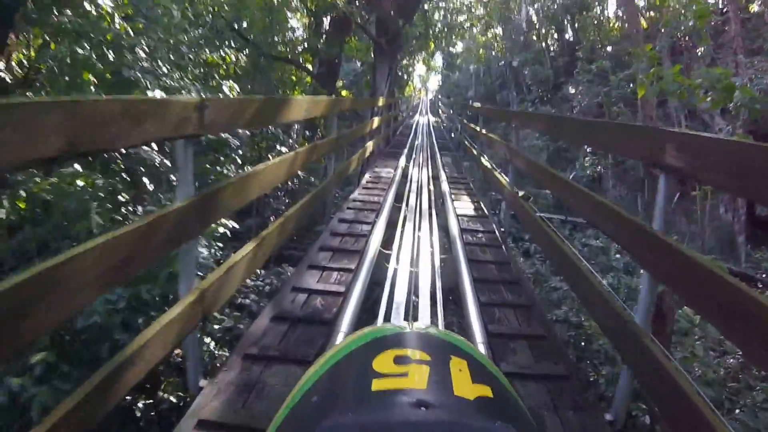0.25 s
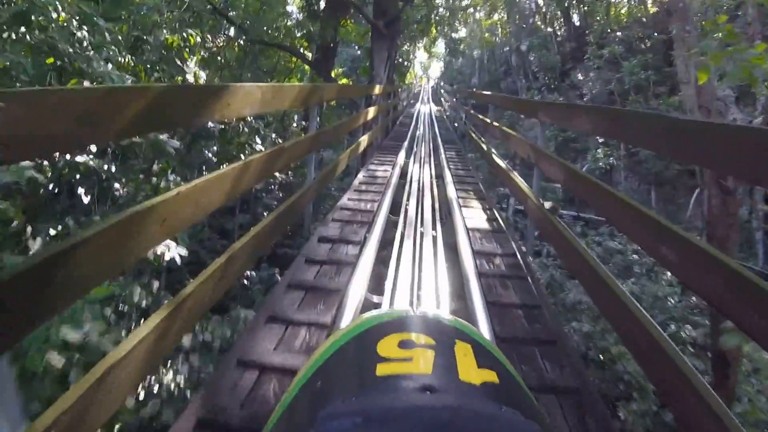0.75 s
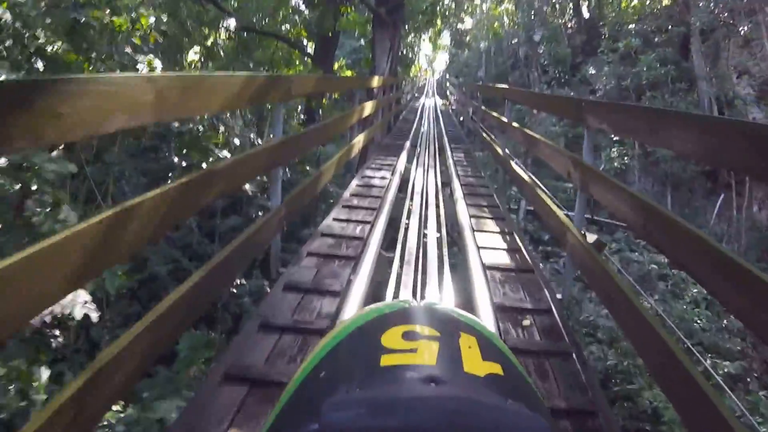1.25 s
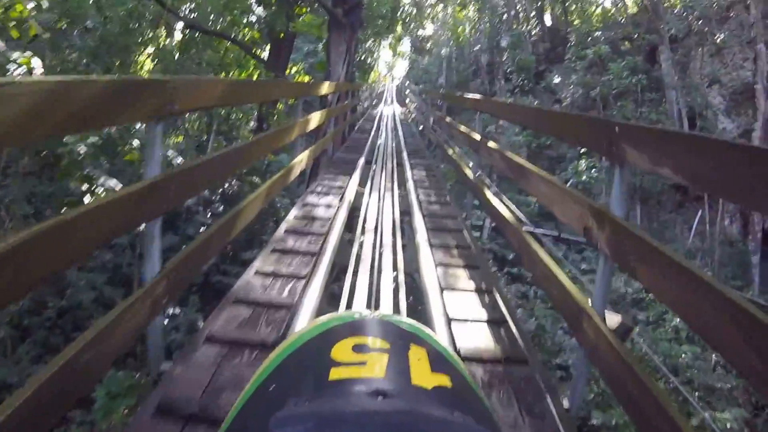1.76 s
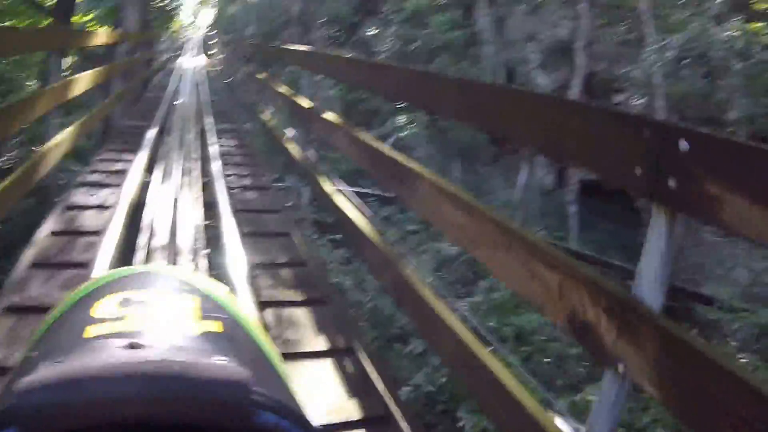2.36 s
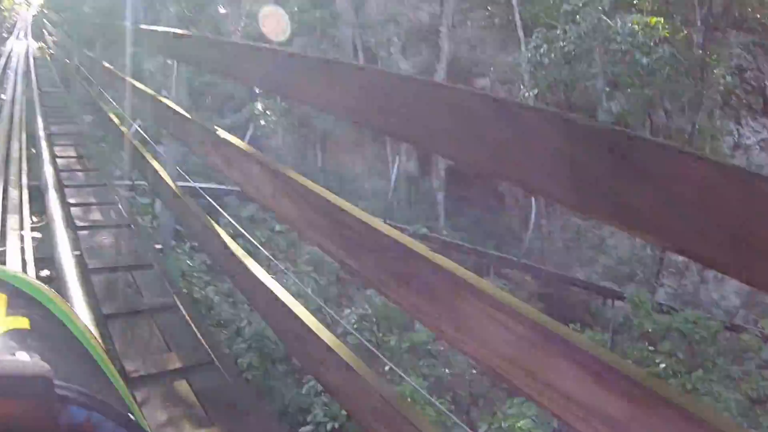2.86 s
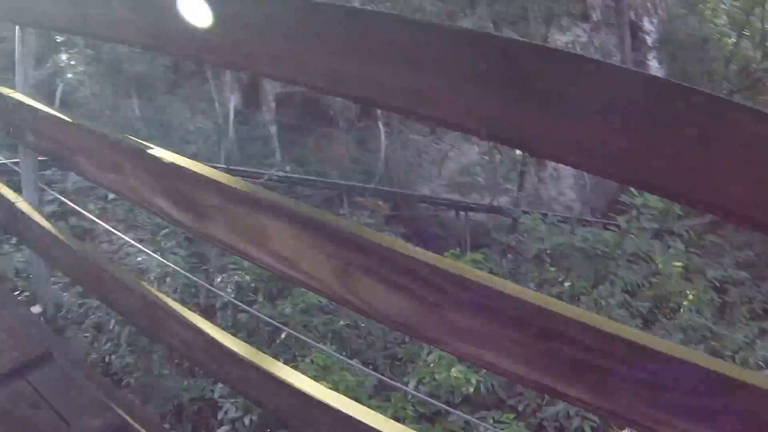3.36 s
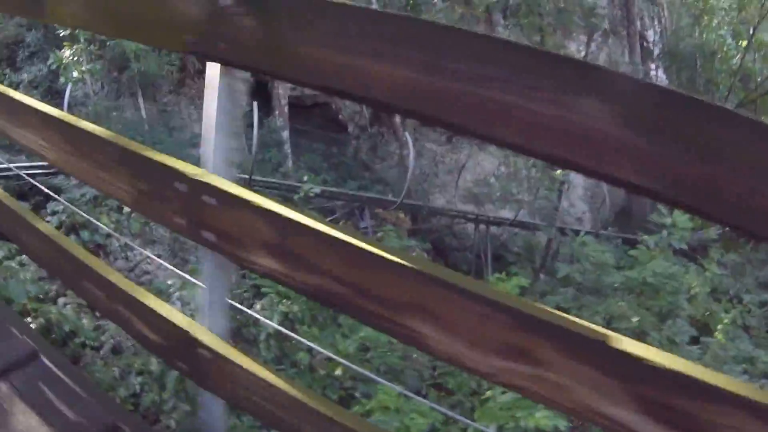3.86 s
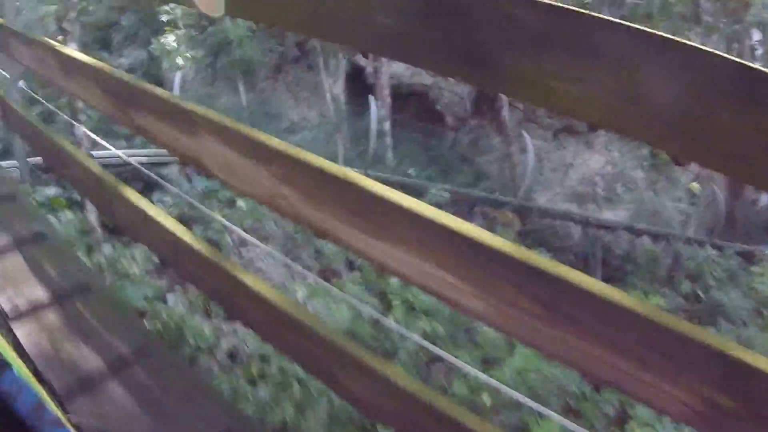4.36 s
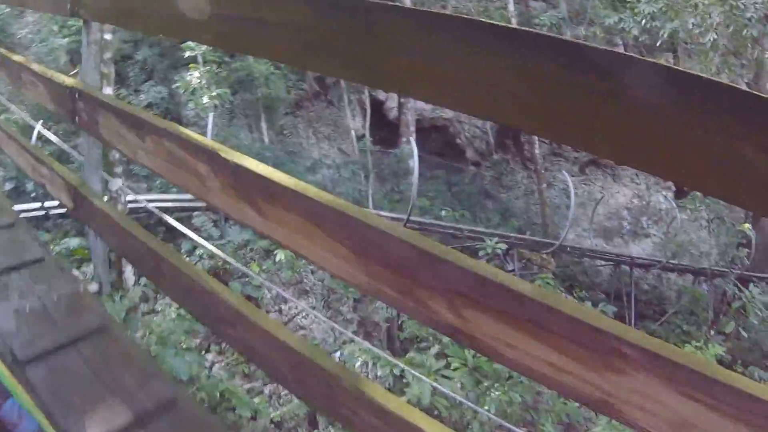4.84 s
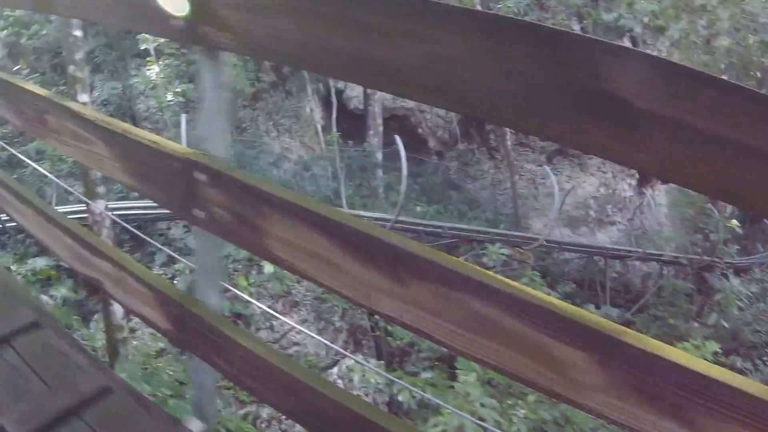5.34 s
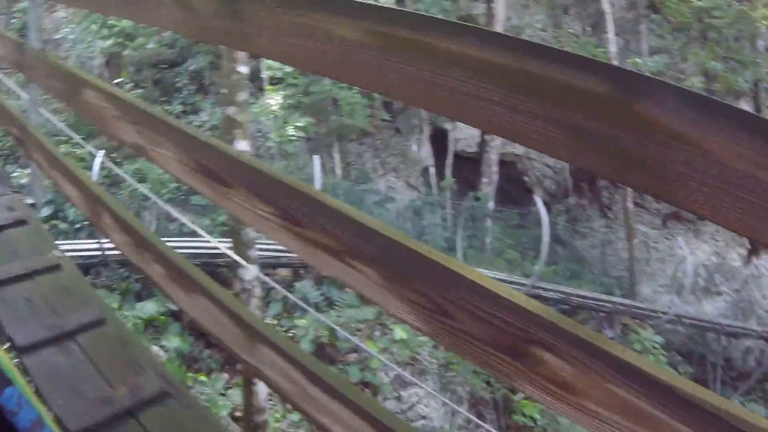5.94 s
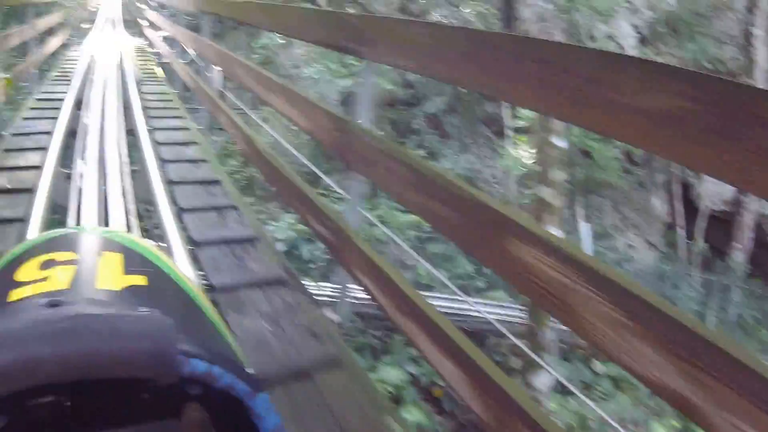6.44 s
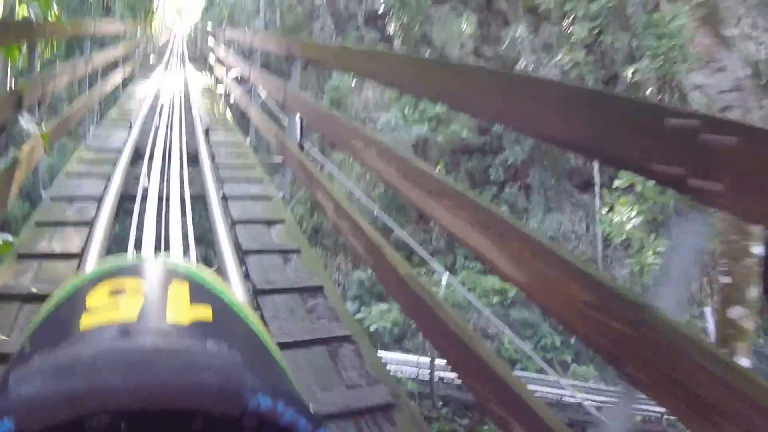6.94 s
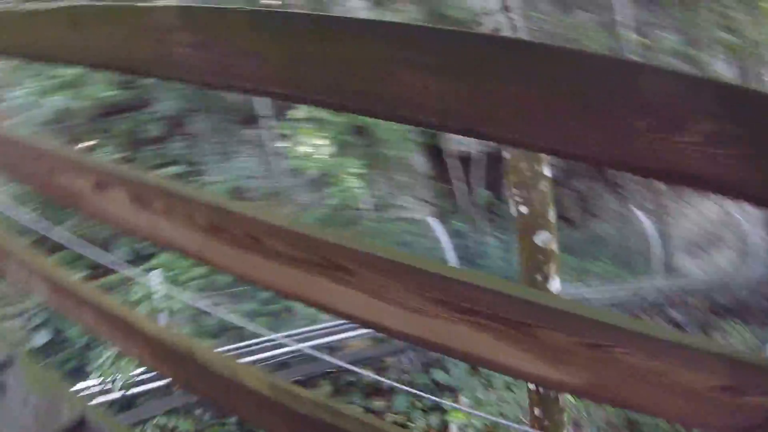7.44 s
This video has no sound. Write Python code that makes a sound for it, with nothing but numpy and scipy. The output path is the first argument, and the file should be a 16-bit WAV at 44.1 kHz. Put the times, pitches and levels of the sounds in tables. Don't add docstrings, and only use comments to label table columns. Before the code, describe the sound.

Cart wheels thud in pairs over steel rail joints, hollow shell booming, panels slapping and loose metal clacking, over low rumble and forest insects.

```python
import sys
import numpy as np
from scipy import signal
from scipy.fft import rfft, irfft
from scipy.io import wavfile
from scipy.ndimage import uniform_filter1d

SR = 44100
rng = np.random.default_rng(int(sys.argv[2]) if len(sys.argv) > 2 else 0)


def nominal_scale(level):
    x = np.asarray(level, float) / 20
    return 10 ** x


def waveform_to_disk(signal):
    frames = np.transpose(np.atleast_2d(signal))
    scaled = np.clip(frames, -1, 1) * 32767
    samples = np.round(scaled).astype(np.int16)
    wavfile.write(sys.argv[1], SR, samples)


N = 339570
T = np.arange(N) / SR

# pitch in Hz, level in dB, t60 in seconds.
SHELL_MODES = [(101, -13.5, 0.075), (150.5, 2, 0.24), (202.3, -13.5, 0.29), (233.4, -23, 0.53)]
# pitch in Hz, level in dB, t60 in seconds.
PANEL_MODES = [(318, 9.5, 0.054), (419, -7, 0.12), (498.6, -4, 0.074), (608, -6, 0.091), (712, -5.5, 0.048),
               (862, -11, 0.048)]
# frequency in Hz, level in dB.
RATTLE_COLOUR = [(410, 0.5), (700, 3), (965, -1.5), (1180, -0.5), (1530, -6.5), (1970, -5.5), (3440, -21.5),
                 (4740, -23), (5930, -25.5), (9000, -75.5), (11700, -78), (19800, -120)]
# start in seconds, first blow in dB, gap in seconds, second blow in dB, third blow in dB.
RAIL_JOINTS = [(.127, -25, .017, -10, -11.5), (.893, -12, .018, -4.5, -14.5), (1.641, -8.5, .03, -9.5, -18),
               (2.415, -10, .028, -7.5, -30), (3.173, -10.5, .028, -5.5, -27),
               (3.945, -8.5, .019, -6, -17.5), (4.688, -8.5, .022, -4.5, -18),
               (5.453, -9.5, .023, -5.5, -14), (6.233, -8.5, .019, -4.5, -33), (6.994, -8, .029, -8, -42)]
# start in seconds, shell in dB, panel in dB, panel pitch in Hz.
REAR_WHEELS = [(1.34, -27.5, -28, 485), (2.128, -24.5, -25, 384), (2.148, -26.5, -25, 642),
               (2.174, -22.5, -28, 346), (2.93, -29, -33.5, 380), (2.964, -20, -20.5, 497),
               (3.66, -25.5, -28.5, 470), (3.7, -29.5, -32, 384), (4.418, -21.5, -26.5, 445),
               (5.171, -26, -21, 419), (5.192, -21, -19, 458), (5.939, -33.5, -21, 669),
               (5.978, -19, -22.5, 602), (6.712, -19.5, -21, 347), (6.729, -22.5, -25, 413),
               (6.745, -25, -20.5, 390), (7.52, -20, -20, 384)]
# start in seconds, shell in dB, panel in dB, panel pitch in Hz.
RAIL_BUMPS = [(.784, -22, -29, 399), (0.83, -16.5, -22.5, 400), (1.108, -22.5, -25.5, 384),
              (1.783, -21.5, -22, 585), (2.367, -17, -22.5, 359), (2.769, -17, -23.5, 427),
              (3.513, -31, -34, 379), (3.542, -24, -26, 523), (3.822, -30, -26, 510),
              (4.895, -19.5, -23.5, 475), (5.255, -22.5, -30, 364), (5.298, -23, -25, 448),
              (5.76, -25, -27.5, 535), (6.349, -19, -29, 536), (6.914, -23.5, -30.5, 373),
              (7.104, -30, -32.5, 510), (7.217, -16, -19, 575), (7.626, -25, -35.5, 381)]


def curve(table):
    s, *columns = np.transpose(table)
    return [np.interp(T, s, c) for c in columns]


def unit(x):
    return x / np.sqrt(np.mean(x ** 2))


def ring(x, modes):
    out = 0
    for hz, db, t60 in modes:
        r = np.exp(-np.log(1000) / (t60 * SR))
        w = 2 * np.pi * hz / SR
        out = out + nominal_scale(db) * signal.lfilter([0, r * np.sin(w)], [1, -2 * r * np.cos(w), r * r], x)
    return out


def colour(x, table):
    hz, db = np.transpose(table)
    f = np.fft.rfftfreq(len(x), 1 / SR) + 1
    return irfft(rfft(x) * nominal_scale(np.interp(np.log(f), np.log(hz), db)), len(x))


def low_pass(x, order, hz):
    return signal.sosfilt(signal.butter(order, hz, fs=SR, output="sos"), x)


def band(lo_hz, hi_hz):
    sos = signal.butter(2, [lo_hz, hi_hz], "band", fs=SR, output="sos")
    return unit(signal.sosfilt(sos, rng.standard_normal(N)))


def walk(rate):
    k = int(SR / rate)
    steps = np.repeat(rng.standard_normal(N // k + 1), k)
    return uniform_filter1d(uniform_filter1d(steps, k), k)[:N]


def add(out, s, piece):
    i = max(int(s * SR), 0)
    out[i:i + len(piece)] += piece[:N - i]


def whine(table):
    hz, db = curve(table)
    return nominal_scale(db + 3.7 * walk(9.6)) * band(7.3, 55) * np.sin(2 * np.pi * np.cumsum(hz) / SR)


def pings(table, rise_s):
    out, t = np.zeros(N), T[:SR // 4]
    for (s, db, hz, t60), noise in zip(table, rng.standard_normal((len(table), len(t)))):
        wobble = 2.1 * np.sqrt(hz / SR) * uniform_filter1d(np.cumsum(noise), size=40) / 10
        swell = nominal_scale(db - 60 * t / np.clip(t60, .02, .2)) * (1 - np.exp(-t / rise_s))
        add(out, s, swell * np.sin(2 * np.pi * hz * t + wobble))
    return out


def blows(table, rise_s, soft, rough, modes, ring_db, crunch=0):
    out, swells, t = np.zeros(N), np.zeros(N), T[:SR // 8]
    chance = rng.standard_normal((len(table), len(t)))
    for (s, db, hz), noise in zip(table, chance):
        swell = nominal_scale(db) * (t / rise_s * np.exp(1 - t / rise_s)) ** soft * (1 - (t / t[-1]) ** 4)
        drift = uniform_filter1d(uniform_filter1d(np.cumsum(noise), size=70), size=70)
        turn = 2 * np.pi * hz * t + rough * np.sqrt(hz / SR) * drift
        add(out, s - rise_s, swell * (np.sin(turn) + 0.076 * np.sin(2 * turn + 1)))
        add(swells, s - rise_s, swell)
    out = out + swells * crunch
    return out + nominal_scale(ring_db) * ring(out, modes), swells


def air(roll_db):
    # frequency in Hz, level in dB per Hz.
    air_colour = [(35, 1), (60, -17), (97, -25.5), (147, -11.5), (255, -11.5), (313, -21.5), (403, -21),
                  (495, -19), (1160, -32), (2100, -33), (3050, -39.5), (3650, -43), (4000, -42.5),
                  (5260, -45.5), (8320, -45.5), (12900, -57), (14400, -58)]
    roll_drift, shake_drift = [db - db.mean() for db in roll_db]
    out = 0
    for hz in 70 * 2 ** np.arange(0, 7.6, .5):
        share = np.clip(np.log2(hz / 600), 0, 1)
        drift_db = (1 - share) * 0.87 * roll_drift + share * (hz < 3800) * 0.42 * shake_drift
        flicker_db = (3.5 - 2.5 * share) * walk(10)
        out = out + band(hz / 1.165, hz * 1.207) * np.sqrt(hz) * nominal_scale(drift_db + flicker_db)
    return nominal_scale(-64.0) * colour(out, air_colour)


def wind():
    # start in seconds, level in dB.
    gusts = [(0, -49), (.2, -36.5), (.9, -40), (1.7, -43), (2.25, -39), (2.95, -39), (4.4, -43), (5.2, -38),
             (5.6, -45.5), (6.0, -40.5), (6.9, -43.5), (7.7, -44)]
    return nominal_scale(curve(gusts)[0] + 0.27 * walk(1.9) + 4.2 * walk(12)) * band(5.0, 75)


def cicadas():
    # start in seconds, level in dB.
    chorus = [
        (0, -71),
        (1.2, -68),
        (2.2, -72),
        (2.55, -58),
        (3.2, -55),
        (4.7, -50),
        (5.4, -55.5),
        (5.85, -54),
        (6.7, -68),
    ]
    db, = curve(chorus)
    hz = 5895 * (1 + 0.003 * walk(1.4))
    far_db = -61.5 + 0.24 * (db + 61.0)
    buzz = band(9, 95) + 0.56 * band(140, 340)
    core = nominal_scale(1.0 * walk(9.4) - 3.0) * buzz * np.sin(2 * np.pi * np.cumsum(hz) / SR)
    near = nominal_scale(db) * (core + nominal_scale(-16.5) * band(6630, 7870))
    return near + nominal_scale(far_db - 1.0) * band(4290, 5800)


def bird():
    # start in seconds, pitch in Hz, level in dB.
    whistle = [
        (2.785, 8350, -80),
        (2.8, 8600, -60),
        (2.825, 9650, -64),
        (2.836, 9360, -58),
        (2.845, 7960, -53),
        (2.865, 6980, -52),
        (2.9, 6840, -70),
        (2.945, 7300, -63),
        (2.96, 7200, -82),
    ]
    hz, db = curve(whistle)
    during = (T > whistle[0][0]) * (T < whistle[-1][0])
    call = nominal_scale(db + 3.0 * walk(120)) * np.sin(2 * np.pi * np.cumsum(hz) / SR) * during
    t = T[:SR // 4]
    trunks = rng.standard_normal(len(t)) * nominal_scale(-38 - 60 * t / 0.4)
    return nominal_scale(-3) * call + signal.fftconvolve(call, trunks)[:N]


def cricket():
    # start in seconds, pitch in Hz, level in dB.
    trill = [(0, 6450, -72), (1.27, 6480, -72), (1.33, 6150, -95), (1.4, 6140, -63), (2.1, 6210, -68),
             (2.5, 6130, -71), (5.8, 6080, -63.5), (7.3, 6130, -73.5), (7.7, 6150, -87)]
    return whine(trill)


def bearing():
    # start in seconds, pitch in Hz, level in dB.
    squeal = [(0, 4000, -69), (1.2, 3940, -70), (2.4, 3900, -70), (2.8, 3850, -86.5), (5.3, 3850, -82),
              (5.8, 3790, -73), (7.7, 3870, -71)]
    return whine(squeal)


def jolts():
    # start in seconds, peak in dB, pitch in Hz.
    jerks = [
        (1.33, -26.5, 29.5),
        (2.42, -34, 46.6),
        (5.0, -33, 41),
    ]
    return blows(jerks, 0.0417, 0.83, 0.27, SHELL_MODES, -68)[0]


def rolling(db, swells):
    # pitch in Hz, level in dB, t60 in seconds.
    hum = [(319.5, -4.5, 0.17), (504, -8, 0.16), (733.4, -14, 0.22)]
    keep = np.exp(-1 / (0.0082 * SR))
    shake = signal.lfilter([1 - keep], [1, -keep], swells)
    rough = nominal_scale(db + 4 * walk(40) + 2 * walk(9))
    grains = rng.standard_normal(N)
    shell = nominal_scale(-34.5) * ring(grains * (rough + 0.34 * shake), SHELL_MODES)
    return shell + nominal_scale(-42.0) * ring(grains * (rough + 0.38 * shake), PANEL_MODES + hum)


def rail():
    # start in seconds, level in dB, pitch in Hz, t60 in seconds.
    strikes = [(0, -69, 2070, 5), (1.64, -45, 1990, .8), (.6, -65, 2075, 3), (1.958, -57, 2000, .3),
               (3.845, -56, 3880, .1), (3.168, -42, 2040, 1.05), (3.63, -58, 3140, .3),
               (4.686, -40, 2020, .8), (4.83, -55, 2020, .7), (6.226, -43, 2000, 1)]
    split_hz, rough = 57, .5
    low, high, t = np.zeros(N), np.zeros(N), T[:SR]
    for s, db, hz, t60 in strikes:
        fade = nominal_scale(db - 60 * t / t60) * (1 - np.exp(-t / 0.0044))
        early = np.exp(-t / 0.16)
        main = np.sin(2 * np.pi * hz * (t - .0015 * early))
        third = .7 * early * np.sin(2 * np.pi * (hz + 2 * split_hz) * t + 2)
        add(low, s, fade * (main + third))
        add(high, s, 1.1 * fade * np.exp(-t / 0.26) * np.sin(2 * np.pi * (hz + split_hz) * t))
    return low * (1 + rough * band(6.6, 45)) + high * (1 + rough * band(6.6, 45))


def panel_notes():
    # start in seconds, level in dB, pitch in Hz, t60 in seconds.
    sung = [(.815, -25.5, 720, 0.044), (.94, -26, 150, .2), (1.778, -30, 810, .05), (2.24, -39, 850, 0.12),
            (2.358, -30, 705, 0.051), (2.385, -23, 149, 0.18), (2.408, -25, 693, .06),
            (4.0, -19.5, 193, 0.22), (5.4475, -16, 1146, .03), (6.99, -46, 1130, .04),
            (1.335, -38, 630, 0.091), (1.635, -20, 677, 0.13), (1.66, -32, 660, 0.11),
            (1.786, -30.5, 580, 0.096), (2.12, -25, 675, 0.12), (2.755, -22, 540, 0.06),
            (3.167, -23, 1020, 0.046), (3.195, -28, 613, 0.074), (3.651, -26, 690, .06),
            (3.937, -30, 750, .05), (4.078, -32.5, 730, 0.052), (4.552, -30.5, 618, 0.044),
            (4.71, -22, 944, 0.15), (4.735, -31, 577, 0.074), (4.735, -32, 957, 0.098),
            (4.829, -31, 1153, .08), (4.856, -37, 1145, .15), (4.891, -25, 498, 0.087),
            (4.893, -39, 1150, 0.09), (5.032, -38.5, 830, 0.075), (5.29, -38, 500, 0.062),
            (5.598, -27, 1060, 0.12), (5.6, -35, 1155, 0.092), (5.616, -21, 780, 0.06),
            (5.667, -29, 903, 0.05), (5.688, -35, 865, 0.13), (5.927, -22, 910, 0.096),
            (5.93, -21.5, 677, 0.16), (5.96, -30, 1250, .08), (6.052, -31, 792, 0.16),
            (6.052, -33, 546, 0.077), (6.126, -44, 775, .08), (6.227, -29, 984, 0.088),
            (6.984, -23, 684, 0.058)]
    return pings(sung, 0.0024)


def metal_notes():
    # start in seconds, level in dB, pitch in Hz, t60 in seconds.
    parts = [(1.634, -31, 2710, 0.048), (1.636, -52, 4441, .1), (1.636, -40.5, 5370, 0.26),
             (1.66, -44, 1860, 0.087), (1.66, -46, 2220, 0.087), (1.784, -37, 2820, 0.054),
             (1.784, -38, 3190, 0.055), (1.81, -39, 2180, .08), (2.12, -35.5, 1324, 0.063),
             (2.12, -47, 2080, 0.2), (2.237, -32, 1850, 0.033), (2.24, -57, 2900, .05),
             (2.407, -30.5, 1880, 0.051), (3.167, -31, 3070, 0.066), (3.167, -39, 4070, .07),
             (3.167, -31.5, 4570, 0.058), (3.96, -44, 1870, 0.086), (3.962, -52, 2900, .08),
             (4.686, -26, 1970, 0.23), (4.686, -34, 3080, 0.099), (4.686, -39, 3630, 0.072),
             (4.71, -33, 1920, 0.045), (4.71, -40, 2320, 0.05), (4.735, -40, 2170, 0.06),
             (4.829, -35, 1453, .08), (4.829, -34, 2580, 0.06), (4.833, -38, 2980, .08),
             (4.957, -37, 1830, .05), (5.03, -40, 1650, 0.043), (5.447, -24, 1570, 0.055),
             (5.447, -43, 4000, 0.14), (5.449, -41, 5300, 0.066), (5.449, -46, 2940, .04),
             (5.472, -32, 1420, 0.088), (5.555, -44, 1780, 0.11), (5.597, -40, 2420, 0.086),
             (5.598, -43, 4270, 0.11), (5.62, -43, 2050, .08), (5.62, -44, 5150, .1),
             (5.638, -45, 3100, .06), (5.689, -47, 1820, 0.065), (5.742, -38, 1830, .08),
             (5.925, -31, 2290, .07), (5.925, -26, 3030, 0.052), (5.96, -42, 2330, 0.091),
             (6.05, -51, 2050, .06), (6.154, -39.5, 1740, .08), (6.229, -35, 3110, .07),
             (6.25, -39, 2050, .1), (6.252, -34, 2800, 0.072)]
    return pings(parts, 0.001)


def more_notes():
    # start in seconds, level in dB, pitch in Hz, t60 in seconds.
    swings = [(.773, -27, 332, 0.048), (.975, -26, 150, .15), (2.185, -26, 308, 0.095),
              (2.21, -29, 159, 0.14), (2.468, -20, 190, 0.094), (3.648, -26.5, 718, 0.042),
              (6.325, -27, 200, .15), (4.406, -24, 334, 0.056), (4.406, -37, 860, 0.086),
              (6.0, -27, 248, 0.086), (6.7, -30, 700, .05), (6.725, -24, 690, .05),
              (6.735, -28, 337, 0.093), (7.04, -24, 200, .06), (7.228, -28, 170, .08),
              (7.535, -30, 153.5, .2), (1.777, -22, 518, .04)]
    return pings(swings, .003)


def dry_ticks():
    # start in seconds, level in dB, t60 in seconds.
    bursts = [(.817, -47, 0.035), (1.81, -38, .08), (.1235, -34, .04), (4.407, -55, 0.036),
              (4.6905, -28.5, 0.048), (5.4483, -13.5, 0.039), (5.51, -32, .05), (5.62, -35, .06),
              (5.6674, -37, .05), (5.689, -42, .04), (5.7427, -43, 0.055), (5.946, -30, .04),
              (5.97, -30, .05), (2.4066, -28, .03), (6.058, -36, 0.052), (6.127, -42.5, .04),
              (6.2323, -30.5, .04)]
    out, t = np.zeros(N), T[:4096]
    for (s, db, t60), noise in zip(bursts, rng.standard_normal((len(bursts), len(t)))):
        fade = nominal_scale(db - 60 * t / max(t60, .015)) * (1 - np.exp(-t / .0004))
        add(out, s, fade * unit(colour(noise, RATTLE_COLOUR)))
    return out


def metal_rows():
    # start in seconds, peak in dB, top in dB, pitch of the loose part in Hz,
    # rattle t60 in seconds.
    at_joints = [(0.1233, -45, -26, 1390, 0.4), (0.8803, -36.5, -3, 1280, 0.55),
                 (1.634, -26.5, -6, 1874, 0.5), (2.4075, -26, -41, 1600, 0.29),
                 (3.167, -23.5, -8, 2070, 0.62), (3.938, -38, -9, 1280, 0.78),
                 (4.6854, -20, -16, 2210, 0.65), (5.447, -17, -14, 1620, 0.76),
                 (6.2262, -24, -10.5, 2040, 0.6), (6.987, -32, -15, 1810, 0.34)]
    falling = [(0.918, -35.5, -8, 1320, 0.1), (1.3119, -37.5, -11, 1250, 0.3),
               (1.333, -37.5, 1, 1400, 0.16), (3.962, -36, -4, 2660, 0.14), (1.785, -31, -18, 2240, 0.75),
               (2.1206, -37, -40, 1790, 0.43), (2.2376, -39, -32, 1940, .12), (2.569, -41, -37, 1780, 0.2),
               (3.8462, -48.5, -4, 1440, 0.62), (4.829, -29.5, -18, 2250, 0.38),
               (4.8926, -34, -29, 2030, 0.5), (4.961, -39.5, -30, 1730, 0.3), (5.028, -49, -22, 1670, 0.54),
               (5.16, -40.5, -14, 1280, 0.97), (5.289, -38.5, -27, 1750, 0.035),
               (5.355, -36.5, -15, 1930, 0.19), (5.5976, -29, -7.5, 2280, 0.32),
               (5.62, -35.5, -16, 1830, 0.55), (5.688, -37, -22, 1800, 1), (5.9247, -21.5, -14, 1736, 0.89),
               (6.1253, -45, -24, 1730, 0.23), (6.156, -57, -23, 1710, 0.12)]
    faint = [(s - 0.011, db - 25.5, -5.5, 1410, 0.17) for s, _, db, _ in REAR_WHEELS + RAIL_BUMPS]
    again = [(s + joint[2], db - 8.5, top_db, hz * 1.2, 0.066)
             for (s, db, top_db, hz, _), joint in zip(at_joints, RAIL_JOINTS)]
    return again + at_joints + falling + faint


def clacks(table):
    # pitch in Hz, level in dB, t60 in seconds.
    metal_modes = [(1146, 4, 0.2), (1358, -3, 0.12), (1703, -6.5, 0.47), (1970, -6, 0.084),
                   (2030, -22, 5.4), (2290, -7.5, 1.6), (2406, -4, 0.14), (2610, -10.5, 0.53),
                   (2967, -10, 0.17), (3820, -20.5, 0.22), (4000, -23.5, 0.53), (4630, -14.5, 0.52)]
    strike, notes, rattle, top = np.zeros((4, N))
    t = T[:SR // 2]
    ping = (1 - np.exp(-t / .0006)) * np.exp(-t / .008)
    crash = nominal_scale(-1.5) * np.tanh(t / .004) * np.exp(-(t / 0.027) ** 2)
    for (s, db, top_db, hz, t60), burst in zip(table, rng.standard_normal((len(table), 61))):
        add(strike, s, nominal_scale(db) * burst)
        add(notes, s, nominal_scale(db) * ping * np.sin(2 * np.pi * hz * t))
        fade = (1 - np.exp(-t / 0.00037)) * (np.exp(-t / 0.017) + 0.59 * nominal_scale(-60 * t / max(t60, .02)))
        add(rattle, s - .001, nominal_scale(db) * fade)
        add(top, s - .001, nominal_scale(db + top_db) * (fade + crash))
    grit = nominal_scale(2.0 * walk(150))
    noise = unit(colour(rng.standard_normal(N), RATTLE_COLOUR))
    out = nominal_scale(-7.0) * rattle * grit * noise + nominal_scale(-14.5) * top * grit * band(2800, 5300) + nominal_scale(-3.5) * notes
    damped = [(f, db, min(.35 * t60, .14)) for f, db, t60 in metal_modes]
    out = out + nominal_scale(-57) * ring(strike, damped)
    out = out + nominal_scale(-46.0) * ring(rattle * grit * rng.standard_normal(N), damped)
    out = colour(out, [(3310, 0), (3560, -6), (3810, 0)])
    spray = nominal_scale(-38) * top * grit * band(6000, 9700)
    return spray + low_pass(out, 6, 6300)


def panel_rows():
    # start in seconds, first in dB, first pitch in Hz, second in dB.
    slaps = [(.129, -23, 550, -24.5), (.905, -13.5, 384, -22.5), (1.643, -17, 546, -19),
             (2.431, -22.5, 470, -25), (3.177, -15.5, 534, -16), (3.949, -19.5, 450, -21.5),
             (4.693, -45, 410, -12), (5.46, -30, 713, -11.5), (6.228, -21.5, 620, -12.5),
             (6.995, -19.5, 473, -20.5)]
    # start in seconds, length in seconds, level in dB, pitch in Hz.
    chatter = [
        (4.917, .07, -44, 563),
        (5.508, 0.2, -32, 712),
        (6.018, .13, -29.5, 657),
        (6.272, .03, -41, 488),
    ]
    rows = [row for s, db1, hz, db2 in slaps for row in ((s, db1, hz), (s + .02, db2, 443))]
    rows += [(s - 0.005946, db, hz) for s, _, db, hz in REAR_WHEELS + RAIL_BUMPS]
    for (s, length, db, hz), c in zip(chatter, rng.standard_normal((len(chatter), 3, 12))):
        late = 0.041 * (np.arange(12) + .25 * c[0])
        levels = db - 30 * late + 8.5 * c[1]
        hits = zip(s + late, levels, hz * (1 + 0.074 * c[2]))
        rows += [hit for hit in hits if hit[0] < s + length]
    return rows


def panels():
    knocks, _ = blows(panel_rows(), 0.00508, 0.56, 1.845, PANEL_MODES, -43.0, crunch=0.35 * band(463, 853))
    return low_pass(knocks, 4, 1250)


def sags():
    rows = [(s + .07, max(db1, db2) - 19.5 - 5.5, 120.7) for s, db1, _, db2, _ in RAIL_JOINTS]
    return blows(rows, 0.04, 0.8, 0.1, SHELL_MODES[:1], -73.5)[0]


def shell_rows():
    joint_hz = [194.3, 197.1, 184.7]
    # start in seconds, level in dB.
    shudders = [(.355, -36), (0.428, -24), (0.879, -12.5), (1.013, -22.5), (1.413, -23), (1.808, -28),
                (2.728, -27), (3.25, -25), (3.345, -23), (4.048, -29), (4.401, -27.5), (4.441, -27),
                (4.458, -25), (4.486, -29.5), (4.754, -12.5), (4.815, -22.5), (5.598, -28), (6.016, -19.5),
                (6.071, -22), (6.292, -21), (6.331, -36), (6.762, -18)]
    rows = [row for s, db1, gap, db2, db3 in RAIL_JOINTS
            for row in zip((s, s + gap, s + gap + 0.02194), (db1, db2, db3), joint_hz)]
    small = [row[:2] for row in REAR_WHEELS + RAIL_BUMPS] + shudders
    rows += [(s, db, 175 * (1 + 0.1 * c) + 1.18 * (db + 14.5))
             for (s, db), c in zip(small, rng.standard_normal(len(small)))]
    return rows


def wheel_thuds():
    return blows(shell_rows(), 0.00743, 1.91, 0.077, SHELL_MODES, -58.0)


def scene():
    # start in seconds, rolling in dB, shaking of loose metal in dB.
    haul = [(0, -41, -67.5), (.3, -41, -66), (2.2, -41, -65.5), (2.4, -33.5, -60), (3.0, -40, -66.5),
            (3.3, -39, -60), (4.7, -39, -65), (5.25, -39, -64.5), (5.68, -39, -48), (5.96, -40, -64),
            (6.4, -35, -60), (7.1, -37.5, -64.5), (7.35, -38.5, -61.5), (7.7, -36, -64)]
    roll_db, shake_db = curve(haul)
    thuds, swells = wheel_thuds()
    cart = nominal_scale(-1.5) * thuds + sags() + nominal_scale(-5.5) * panels() + clacks(metal_rows())
    cart = cart + rail() + rolling(roll_db, swells) + bearing()
    details = panel_notes() + metal_notes() + more_notes() + dry_ticks()
    forest = air((roll_db, shake_db)) + cicadas() + cricket() + bird()
    return (cart + details + forest + jolts() + wind())[None]


def thin_out(x):
    hz, _, z = signal.stft(x, SR, "cosine", 2048, 1024)
    usual = uniform_filter1d(uniform_filter1d(abs(z), size=60, axis=0), size=5, axis=1)
    chance = rng.standard_normal((len(hz) // 12 + 1, z.shape[1]))
    patch = nominal_scale(3.5 * np.repeat(chance, 12, axis=0)[:len(hz)])
    bar = np.interp(hz, [6500, 8300, 9500, 13700, 14300], [0, .65, 1.15, 1.1, 4])[:, None]
    loud_db = 20 * np.log10(abs(z[:60]).sum(axis=0) + 1e-9)
    bar = bar * (1 + .06 * np.clip(loud_db - np.median(loud_db) - 4, 0, 12))
    return signal.istft(z * (abs(z) > bar * patch * usual), SR, "cosine", 2048, 1024)[1][:N]


def roll_off(x):
    return signal.sosfilt(signal.butter(12, 14580, fs=SR, output="sos"), x)


def record(dry):
    rounded = np.tanh(1.0 * dry[0]) / 1.316
    mix = thin_out(rounded)[None]
    return roll_off(mix)


dry = scene()
out = record(dry)
waveform_to_disk(out)
```